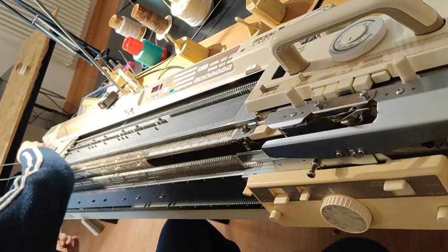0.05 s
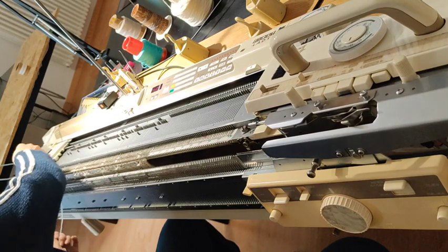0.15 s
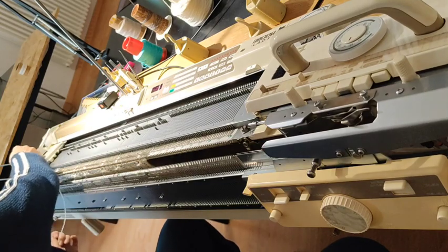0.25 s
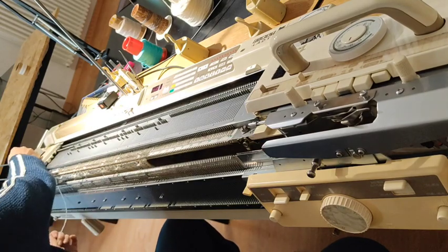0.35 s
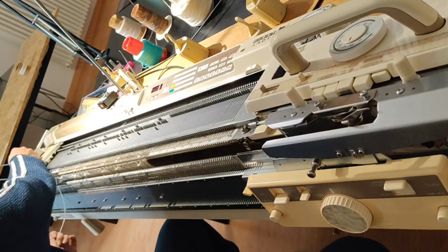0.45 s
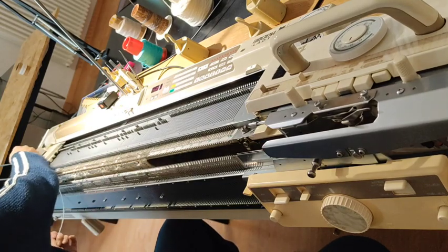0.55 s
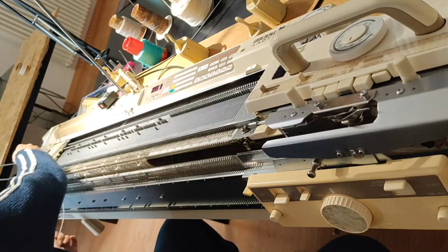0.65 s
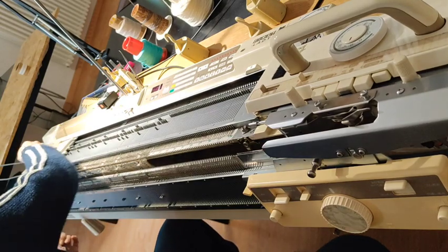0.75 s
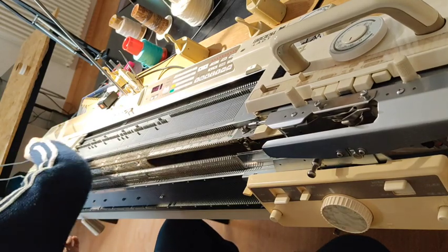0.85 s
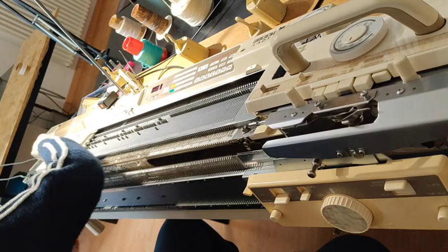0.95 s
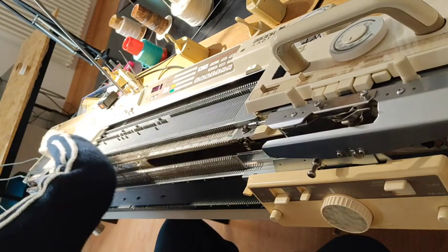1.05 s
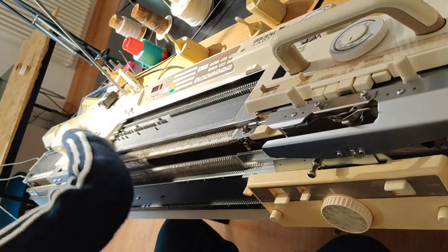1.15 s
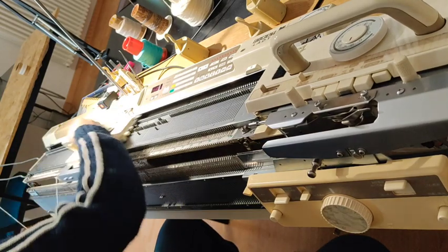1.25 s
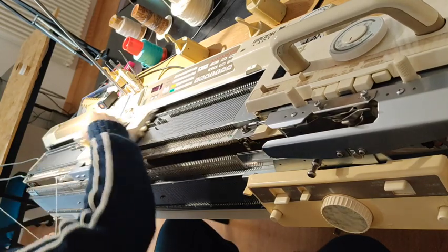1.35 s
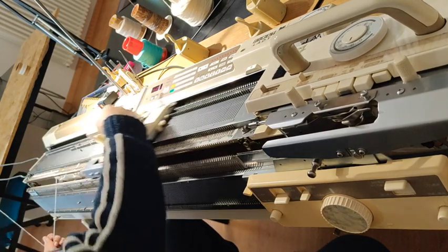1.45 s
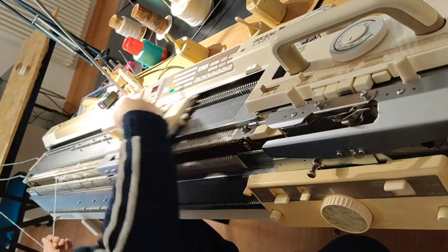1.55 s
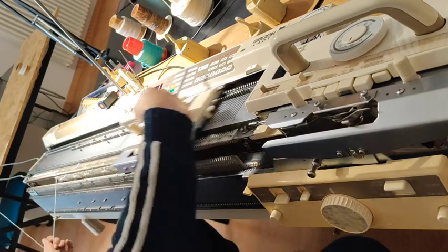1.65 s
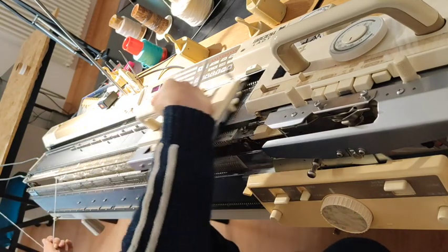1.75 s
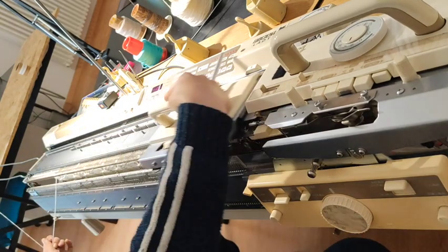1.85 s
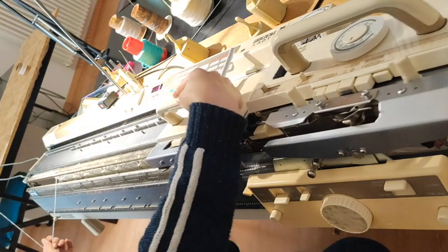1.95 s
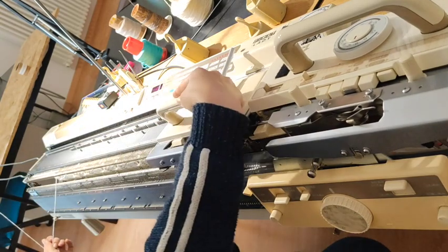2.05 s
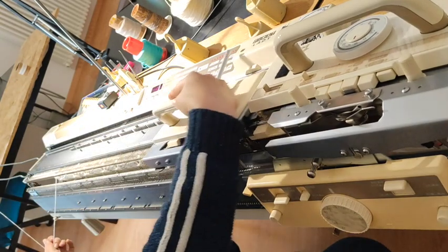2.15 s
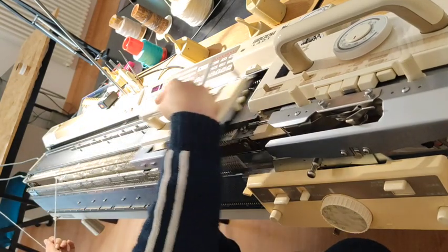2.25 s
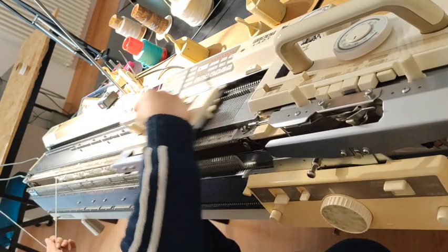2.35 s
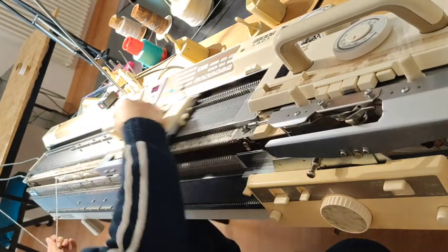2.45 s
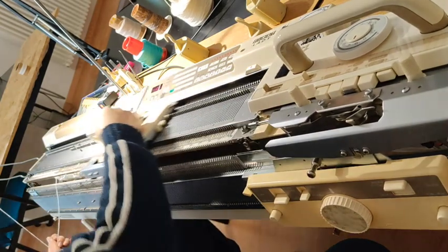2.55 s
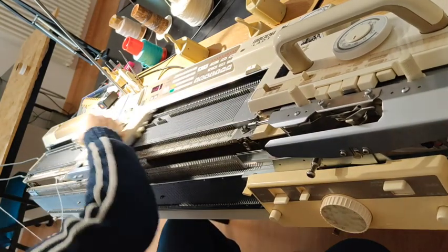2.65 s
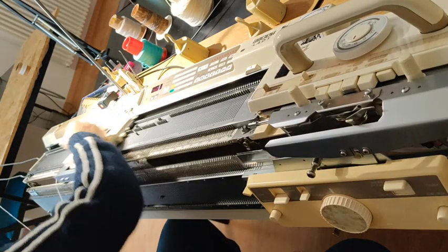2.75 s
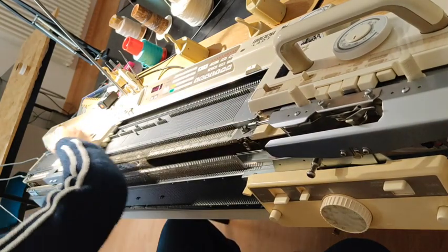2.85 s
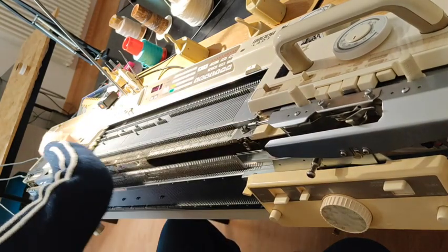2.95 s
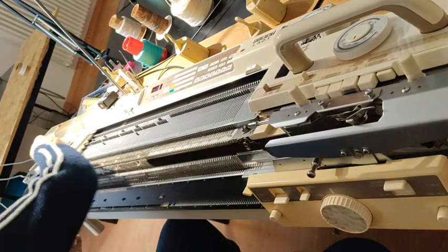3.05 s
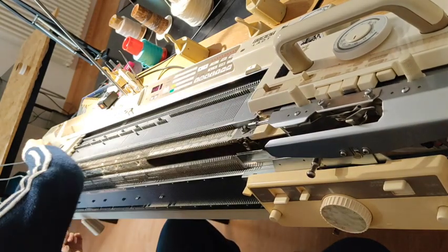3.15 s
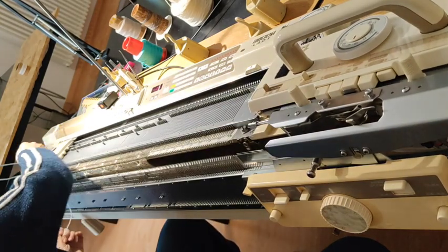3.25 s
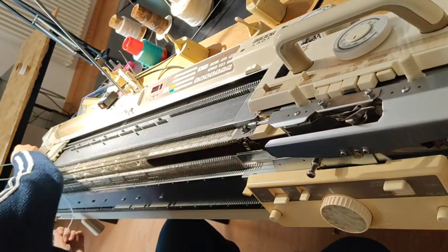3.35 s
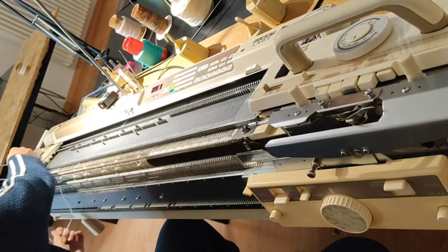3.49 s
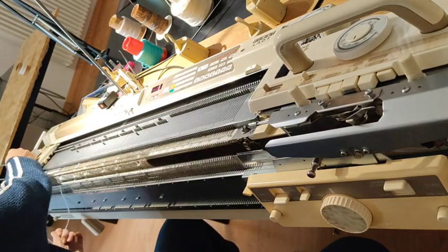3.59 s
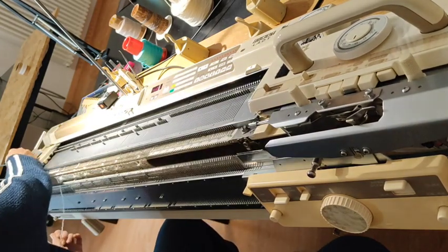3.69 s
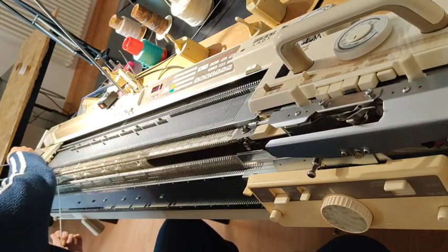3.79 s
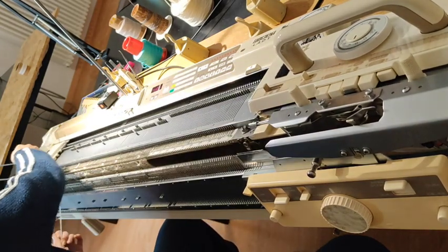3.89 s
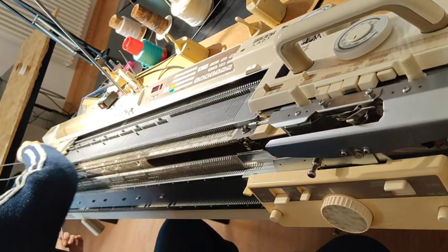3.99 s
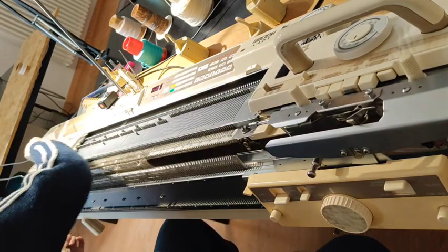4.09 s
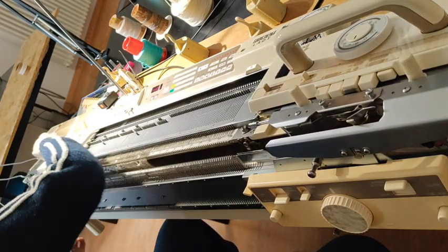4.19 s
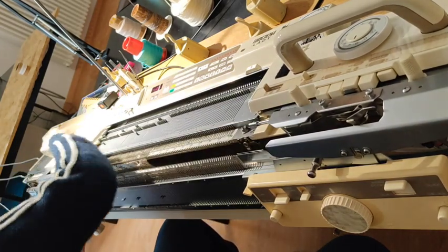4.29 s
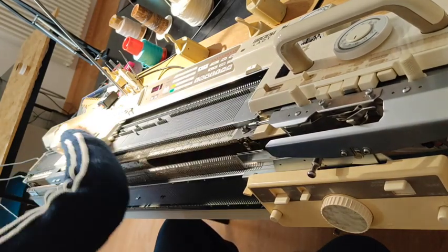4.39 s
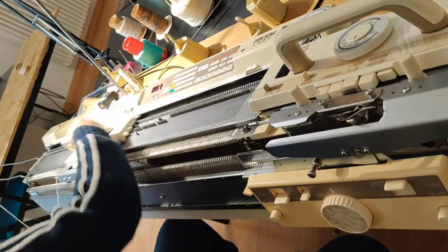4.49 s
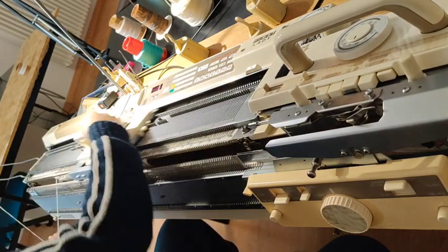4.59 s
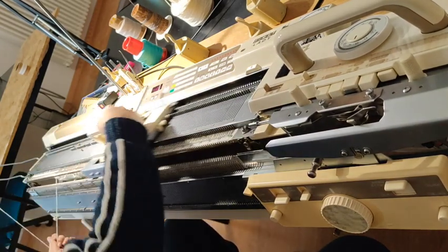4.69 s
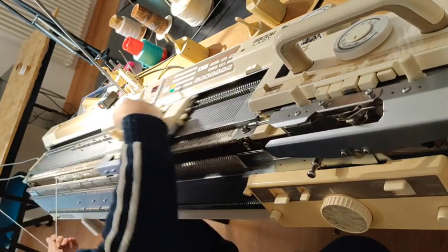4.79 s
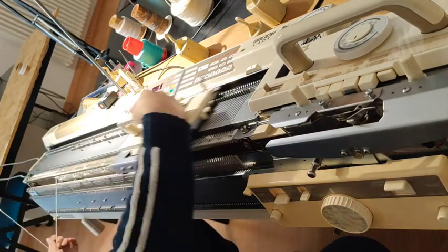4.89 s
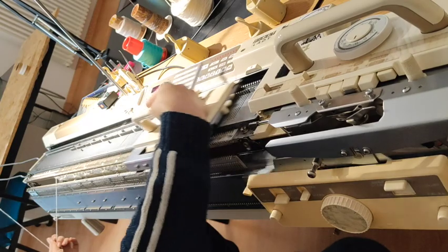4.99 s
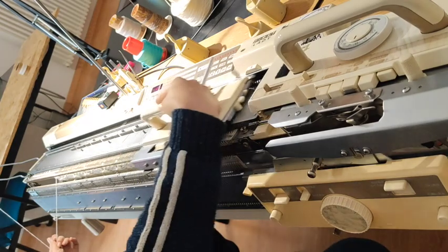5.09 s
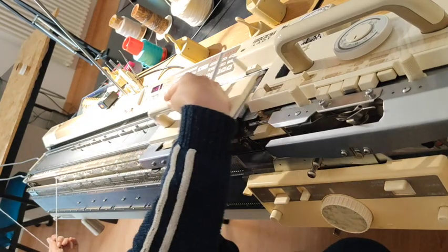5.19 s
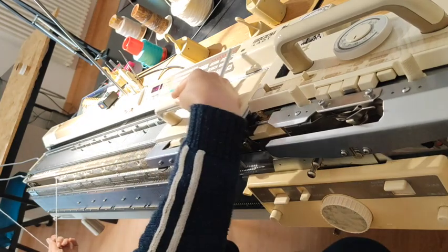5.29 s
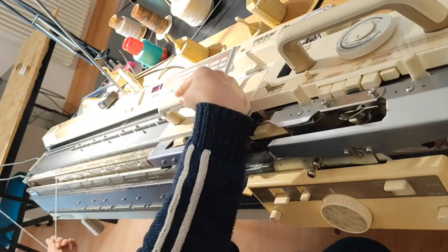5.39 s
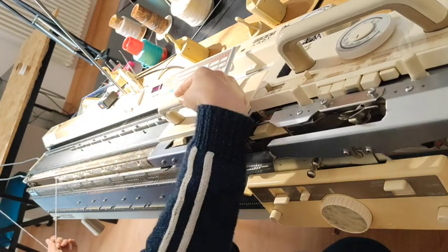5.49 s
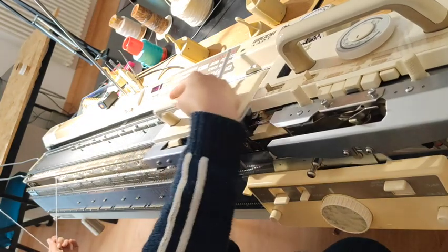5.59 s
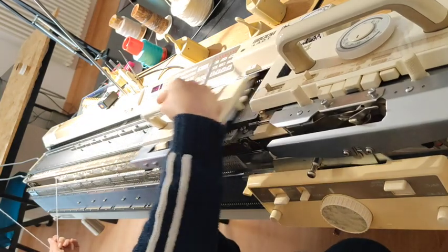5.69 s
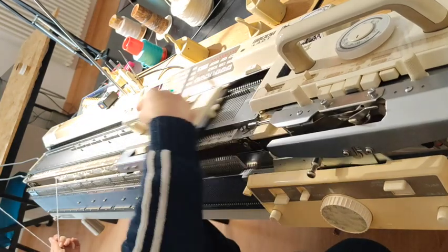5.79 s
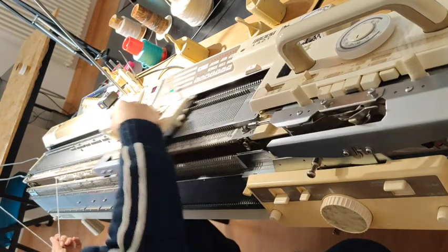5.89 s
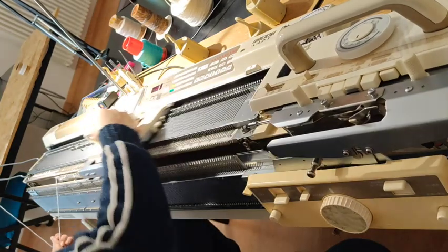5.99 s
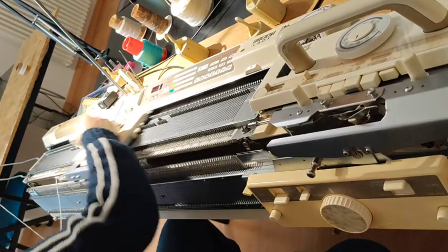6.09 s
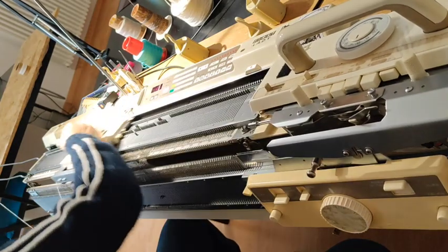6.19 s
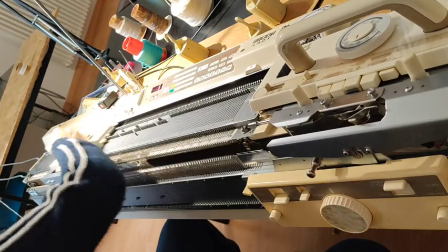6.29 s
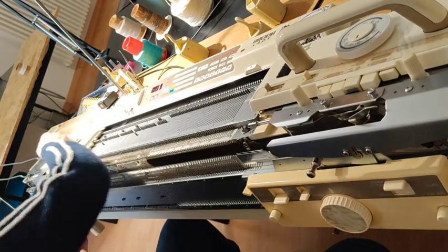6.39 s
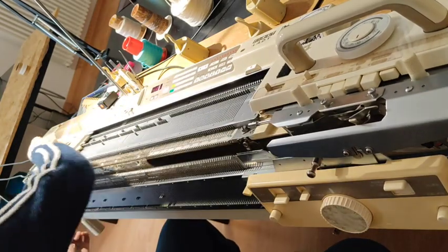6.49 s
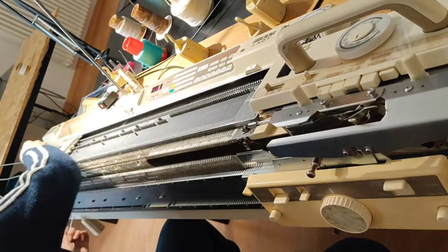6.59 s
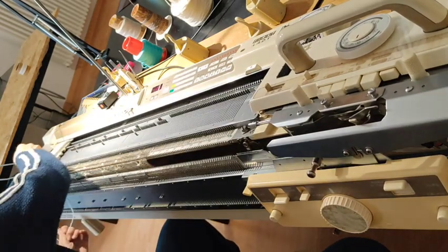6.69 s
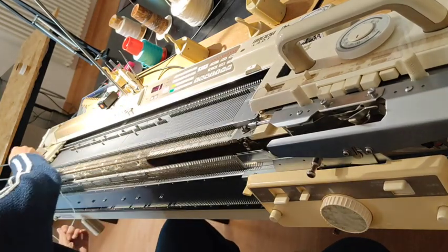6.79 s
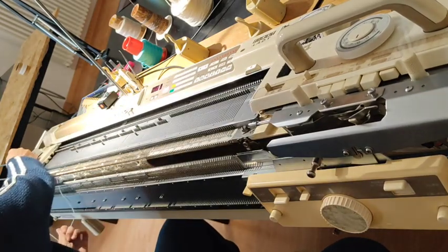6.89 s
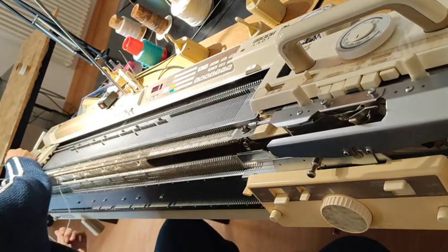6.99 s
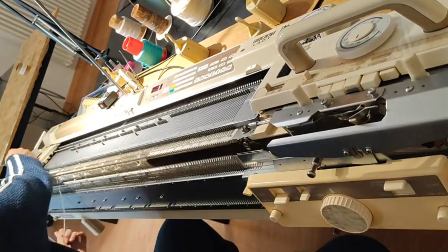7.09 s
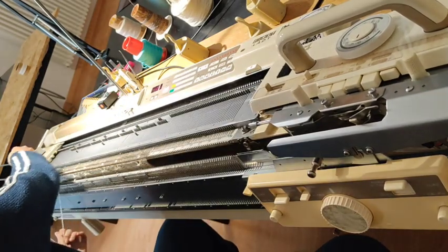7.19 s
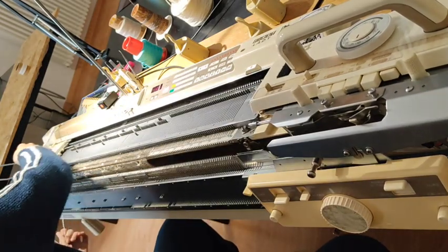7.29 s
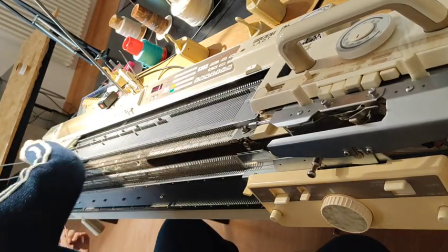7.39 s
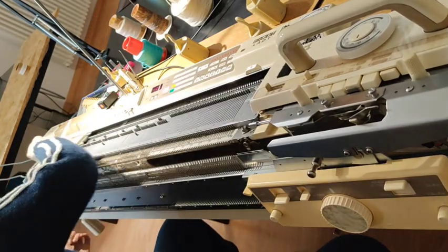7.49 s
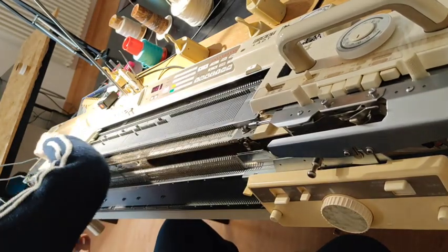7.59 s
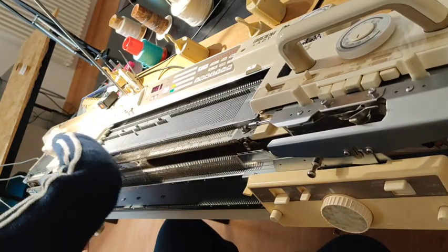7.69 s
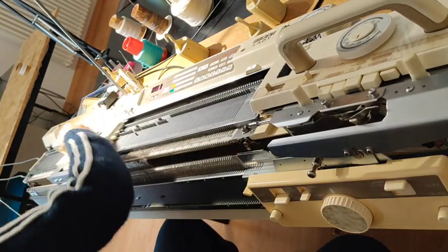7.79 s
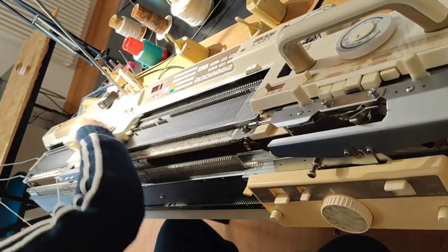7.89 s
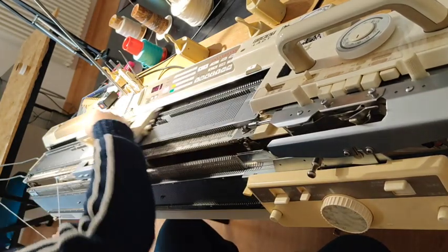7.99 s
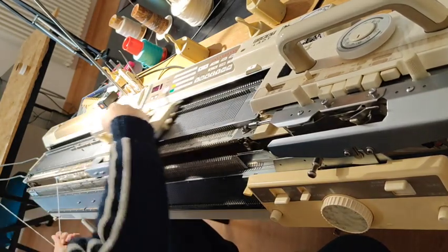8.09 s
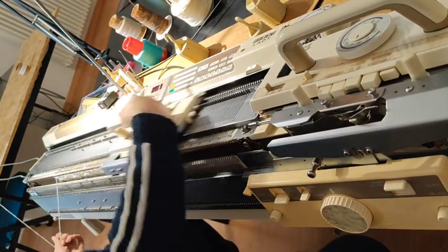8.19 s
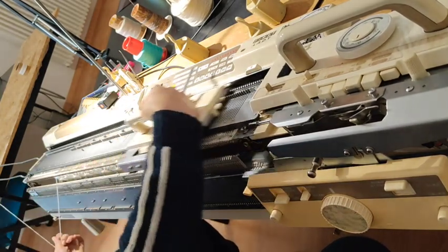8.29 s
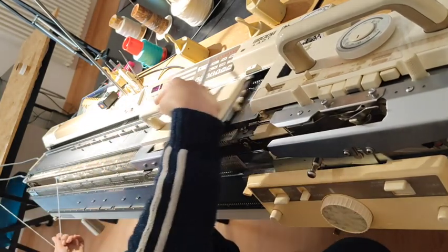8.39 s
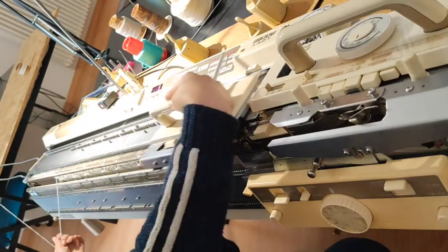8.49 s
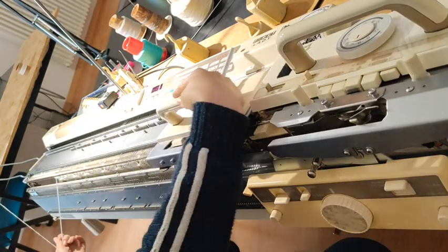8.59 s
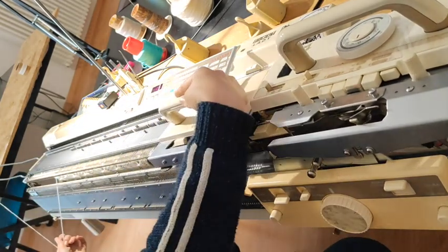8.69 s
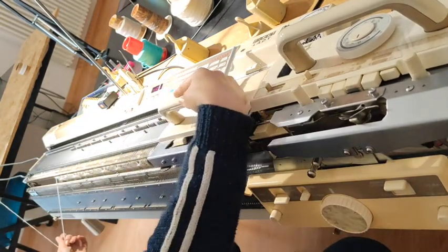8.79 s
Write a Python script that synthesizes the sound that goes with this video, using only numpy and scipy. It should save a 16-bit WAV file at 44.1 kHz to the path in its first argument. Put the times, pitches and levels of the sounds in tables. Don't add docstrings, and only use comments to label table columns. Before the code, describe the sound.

A hand-pushed knitting-machine carriage rattles back and forth over steel needles, bright dense clatter broken by ticks and short quiet pauses at each turn.

```python
import sys
import numpy as np
from scipy import signal
from scipy.fft import rfft, irfft, next_fast_len
from scipy.io import wavfile
from scipy.ndimage import uniform_filter1d

SR = 44100
rng = np.random.default_rng(int(sys.argv[2]) if len(sys.argv) > 2 else 0)


def amplitude_ratio(level_db):
    exponent = np.asarray(level_db, float) / 20
    return 10 ** exponent


def wrap_up_sound(samples):
    columns = np.atleast_2d(samples).T
    tamed = np.clip(columns, -1, 1)
    steps = np.round(tamed * 32767).astype(np.int16)
    wavfile.write(sys.argv[1], SR, steps)


N = 390285
SIZE = next_fast_len(N + SR // 4, True)
HZ = np.maximum(np.arange(SIZE // 2 + 1) * SR / SIZE, 1)
CONTROL_S = 0.001
LEFT_LAG_S = 0.00012
LAG = np.exp(-2j * np.pi * HZ * np.array([[LEFT_LAG_S], [0]]))

# (engage [s], leave [s], rattle [dB], release [dB/s])
KNITS = [
    (-0.1, 0.018, -14, 78),
    (0.871, 1.678, -14.5, 60),
    (2.358, 2.98, -14.5, 25),
    (3.097, 3.177, -16, 87),
    (3.312, 3.329, -18.5, 300),
    (4.107, 4.726, -14.5, 11),
    (4.87, 4.935, -15.5, 90),
    (5.781, 6.565, -14, 58),
    (6.712, 6.727, -16.5, 200),
    (7.497, 8.28, -14.5, 33),
]


def unit(x):
    return x / np.sqrt(np.mean(x ** 2))


def along(points):
    hz, value = np.transpose(points)
    return np.interp(np.log(HZ), np.log(hz), value)


def causal(db):
    cepstrum = irfft(np.log(amplitude_ratio(db)), SIZE)
    cepstrum[1:SIZE // 2] *= 2
    cepstrum[SIZE // 2 + 1:] = 0
    return np.exp(rfft(cepstrum))


def mode(hz, width):
    return 1 / (1 + 1j * (HZ ** 2 - hz ** 2) / (HZ * width))


def modes(rows):
    return sum((-1) ** k * amplitude_ratio(db) * mode(hz, width) for k, (hz, width, db) in enumerate(rows))


def dying(power, decay_s):
    pole = np.exp(-2 / (decay_s * SR))
    return signal.lfilter([1 - pole], [1, -pole], power)


def bursts(spikes, response, decay_s, rise_s=0.0002):
    # (frequency [Hz], share [0-1])
    likeness = [(60, 1), (290, 0.7), (640, 0.59), (1400, 0.05), (16000, 0.05)]
    room_t60_s, wet_db = 0.32, -0.5
    direct = dying(dying(spikes ** 2, rise_s), decay_s)
    tail = dying(direct, room_t60_s / np.log(1000))
    shape = np.sqrt(direct + amplitude_ratio(wet_db) ** 2 * tail)
    shared, *own = rfft(shape * rng.standard_normal((3, N)), SIZE)
    like = np.clip(along(likeness), 0, 1)
    mix = np.sqrt(like) * LAG * shared + np.sqrt(1 - like) * np.array(own)
    return irfft(response * mix, SIZE)[:, :N]


def contacts(per_s, spread_db, steady):
    chance, size = rng.random(N), rng.standard_normal(N)
    return unit((chance < per_s / SR) * amplitude_ratio(spread_db * size) + steady)


def walk(per_s):
    k = int(SR / per_s)
    return unit(uniform_filter1d(uniform_filter1d(rng.standard_normal(N), k), k))


def band_unit(response, lo_hz, hi_hz, ears):
    band = (HZ > lo_hz) * (HZ < hi_hz)
    return response / np.sqrt(np.mean(np.abs(response) ** 2 * ears * band))


def ports():
    # (frequency [Hz], width [Hz], gain [dB])
    port_peaks = [(8985, 940, 15.5), (7740, 774, 17.5)]
    # (frequency [Hz], difference [dB])
    bass_tilt = [(60, 7), (300, 3.5), (700, 5), (1500, 0), (3000, -0.3)]
    peak = np.array([1 + amplitude_ratio(db) * mode(hz, width) for hz, width, db in port_peaks])
    return peak * amplitude_ratio(along(bass_tilt) * np.array([[0.5], [-0.5]]))


def bodies():
    # (frequency [Hz], level [dB per Hz])
    needle_steel = [(3000, -33.5), (5000, -13.5), (6500, 0.5), (7300, 1), (8400, 2), (9400, 1), (10100, -9),
                    (11500, -6.5), (13000, -9), (16000, -17)]
    # (frequency [Hz], level [dB per Hz])
    cam_plate = [(300, -36), (900, -3), (1500, -9.5), (2100, 1.5), (2800, -1.5), (3700, -5), (5000, -2.5),
                 (6500, -8), (12000, -20.5)]
    # (frequency [Hz], level [dB per Hz])
    rail_rub = [(60, -31.5), (105, -9.5), (130, -20), (250, -11), (400, -13), (470, -2), (670, 0.5),
                (850, -1), (1200, -3.5), (1700, -8.5), (4000, -33.5)]
    # (frequency [Hz], width [Hz], level [dB])
    housing = [(450, 49, -7), (570, 11, -18), (652, 40, -4), (841, 17, -5)]
    ears = np.mean(np.abs(ports()) ** 2, axis=0)
    steel = band_unit(causal(along(needle_steel)), 5500, 11000, ears)
    plate = band_unit(causal(along(cam_plate)), 1800, 4870, ears)
    shell = band_unit(causal(along(rail_rub)) * (1 + modes(housing)), 400, 1210, ears)
    return steel, plate, shell, ears


def arches(time, rows, floor_db):
    s = np.arange(0, N / SR + CONTROL_S, CONTROL_S)
    arch_db = 13
    swells = [db - arch_db * ((2 * s - a - b) / (b - a)) ** 2 for a, b, db in rows]
    return np.interp(time, s, np.maximum(np.max(swells, axis=0), floor_db))


def background(time, ears):
    # (frequency [Hz], level [dB per Hz])
    room_tone = [(30, -4), (75, -8), (105, -3), (135, -16), (220, -4), (350, -10.5), (550, -8), (800, -14),
                 (1300, -17), (2200, -15.5), (5000, -21), (8000, -18), (10100, -42), (15000, -58)]
    # (from [s], to [s], low shake [dB])
    leans = [
        (-0.2, 0.6, -53),
        (1.5, 2.3, -57),
        (2.9, 3.8, -59),
        (3.7, 4.1, -55),
        (4.65, 5.35, -52),
        (5.9, 6.6, -55),
        (6.3, 7.2, -49),
        (7.2, 7.5, -48),
        (7.72, 8.2, -50),
        (8.0, 9.5, -49),
    ]
    room_db, stand_db = -50.5, -62
    air = unit(bursts(np.ones(N), amplitude_ratio(along(room_tone)) / np.sqrt(ears), 0.002))
    sway = mode(40.8, 4.4) ** 2 + amplitude_ratio(-10.5) * mode(61.3, 11) ** 2
    stand = band_unit(sway, 32, 48, ears)
    shake_db = arches(time, leans, stand_db) - 1.5
    return amplitude_ratio(room_db) * air + bursts(amplitude_ratio(shake_db), stand, 0.003)


def table(time, ears):
    # (frequency [Hz], width [Hz])
    table_modes = [(168, 25), (323, 21)]
    # (from [s], to [s], lower mode [dB], upper mode [dB])
    shakes = [(-0.3, 0.9, -47.5, -53.5), (0.85, 1.25, -42.5, -46), (1.15, 1.7, -46, -45),
              (1.6, 2.102, -48, -53), (2.33, 2.85, -46, -41.5), (2.55, 3.1, -40, -45),
              (3.298, 3.55, -46, -52), (4.2, 4.8, -45.5, -40), (5.748, 6.35, -45, -41.5),
              (5.9, 6.5, -41, -46), (7.645, 8.297, -46, -39.5), (7.9, 8.498, -45.5, -51)]
    idle_hum_db, wander_db = (-61, -62), 1.5
    a, b, *tops = np.transpose(shakes)
    hum = np.zeros((2, N))
    for top_db, idle_db, (hz, width) in zip(tops, idle_hum_db, table_modes):
        level_db = arches(time, zip(a, b, top_db), idle_db) - 4.0 + wander_db * walk(9.9)
        wood = band_unit(mode(hz, width) ** 2, hz / 2, hz * 2, ears)
        hum += bursts(amplitude_ratio(level_db), wood, 0.002)
    return hum


def ticks(steel, plate, shell, ears):
    # (time [s], peak [dB], dull part re peak [dB], ring re peak [dB])
    latches = [(0.4878, -28, -15, -19), (0.5272, -25, -17, -20), (0.5387, -24, -15, -21),
               (0.5741, -29, -9, -13), (0.6105, -19, -18, -15), (0.6644, -18.5, -12, -9),
               (0.6903, -14, -18, -19), (0.8091, -18, -14, -23), (1.9665, -11.5, -19, -11),
               (1.9967, -8, -12.5, -13.5), (2.164, -21.5, -12, -17), (2.2189, -25, -21, -9),
               (2.2303, -18, -14, -15), (2.2862, -16, -18, -14), (2.2952, -13, -17, -22),
               (3.7354, -22.5, -6, -13), (3.925, -23, -20, -17), (3.9774, -5.5, -16.5, -17),
               (5.2295, -22.5, -18.5, -17), (5.288, -21, -20, -18), (5.2958, -10.5, -18, -14),
               (5.3675, -13.5, -8, -17), (5.5692, -25, -11, -18), (5.6236, -24, -13, -11),
               (5.6406, -20, -21, -18), (5.698, -10, -20, -19), (7.1258, -24, -5.5, -15),
               (7.3088, -23, -19, -18), (8.5872, -10.5, -21, -14), (8.6652, -19, -19, -16)]
    # (time [s], peak [dB])
    throws = [(0.853, -11), (0.8628, -7), (1.1832, 1.5), (1.6596, -3), (2.3476, -12), (2.362, -4),
              (2.5541, -2), (2.7593, -4.5), (3.1078, -4), (3.304, -9), (3.3129, -10), (4.1071, -9),
              (4.119, 0), (4.1969, 0), (4.8803, -3), (5.0574, -9), (5.7857, -6), (6.188, -8), (6.3485, -6),
              (6.5217, -6), (6.5794, -2), (6.71, -4), (7.4874, -13), (8.258, -10), (8.846, -21.5)]
    # (frequency [Hz], width [Hz], level [dB])
    tick_ring = [(2130, 480, 4), (2710, 200, 21), (4400, 1200, 1.5), (1300, 600, -12)]
    throw_dull_db, throw_ring_db, pan_db = -24, -20, -3
    hits = latches + [(s, db, throw_dull_db, throw_ring_db) for s, db in throws]
    s, peak_db, dull_db, ring_db = np.transpose(hits)
    at = np.minimum((s * SR).astype(int), N - 1)
    bright, ringing, dull = np.zeros((3, N))
    bright[at] = amplitude_ratio(peak_db)
    ringing[at] = amplitude_ratio(peak_db + ring_db)
    dull[at] = amplitude_ratio(peak_db + dull_db)
    ringing_plate = plate + amplitude_ratio(2.0) * band_unit(modes(tick_ring), 1500, 5000, ears)
    crack = amplitude_ratio(11.5) * bursts(bright, steel, 0.0054, 0.0005)
    ring = amplitude_ratio(15) * bursts(ringing, ringing_plate, 0.0061, 0.0005)
    knock = amplitude_ratio(16) * bursts(dull, shell, 0.011, 0.00087)
    return (crack + ring + knock) * amplitude_ratio(np.array([[pan_db], [-pan_db]]) / 2)


def held_back(time):
    build_db, build_s = 5, 0.11
    since = np.array([time - a for a, b, *_ in KNITS if b - a > build_s])
    return build_db * np.max((since > 0) * np.exp(-np.abs(since) / build_s), axis=0)


def rail(rub_db, shell):
    judder = contacts(400, 1.9, 0.066) * amplitude_ratio(rub_db + 1.12 * walk(12.6))
    return bursts(judder, shell, 0.0033, 0.00082)


def rattle(time):
    # (starts [s], at speed [s], slows [s], stops [s], level [dB])
    glides = [(-1.0, -0.8, 0.3, 0.52, -29), (0.46, 0.7, 1.866, 2.2, -30), (2, 2.31, 3.37, 3.75, -26.5),
              (3.72, 3.75, 3.8, 3.92, -45), (3.5, 4, 3.97, 4.0, -38), (4, 3.985, 5.03, 5.21, -24.5),
              (5, 5, 5.26, 5.3, -45), (5.27, 5.5, 5.38, 5.5, -38.5), (5.52, 5.5, 5.69, 5.72, -37),
              (5.67, 5.5, 6.806, 7.1, -25.5), (7, 7.13, 7.18, 7.3, -42), (7, 7.5, 8.42, 8.62, -25),
              (8.44, 8.52, 8.6, 8.77, -36)]
    rest_db = -56
    engage_db_per_s, sag_db_per_s, let_go_db_per_s2 = 600, 2.05, 250
    s = np.arange(0, N / SR + CONTROL_S, CONTROL_S)
    levels = [np.interp(s, row[:-1], [rest_db, row[-1], row[-1], rest_db]) for row in glides]
    for a, b, db, fall in KNITS:
        engage = engage_db_per_s * np.maximum(a - s, 0)
        sag = sag_db_per_s * (s - a)
        let_go = np.maximum(s - b, 0) * (fall + let_go_db_per_s2 * (s - b))
        levels.append(db - engage - sag - let_go)
    return np.interp(time, s, np.max(levels, axis=0))


def needles(rattle_db, cam_db, steel, plate):
    clusters_db = 0.6 * walk(30)
    strikes = contacts(850, 4.2, 0.08) * amplitude_ratio(rattle_db + clusters_db)
    thin = amplitude_ratio(-1.5) * bursts(strikes, steel, 0.0016)
    below = amplitude_ratio(-2.0) * bursts(strikes * amplitude_ratio(cam_db), plate, 0.0039, 0.0006)
    return thin + below


def scene():
    time = np.arange(N) / SR
    steel, plate, shell, ears = bodies()
    rattle_db = rattle(time)
    below_db = -15 - rattle_db
    rub_db = np.minimum(-17.5 + 0.54 * below_db, -2.5)
    cam_db = -11.5 + 0.17 * below_db
    pan_db = np.maximum(2.4 - 0.32 * below_db, -3)
    bed = needles(rattle_db, cam_db, steel, plate) * amplitude_ratio(np.array([pan_db, -pan_db]) / 2)
    rub = rail(rattle_db + rub_db - held_back(time) - 1.88, shell)
    carriage = bed + rub + ticks(steel, plate, shell, ears)
    return carriage + table(time, ears) + background(time, ears)


def band_limit(x):
    return signal.sosfilt(signal.butter(12, 16010, fs=SR, output="sos"), x)


def record(dry):
    ceiling = 0.74
    coloured = irfft(rfft(dry, SIZE) * ports(), SIZE)[:, :N]
    rounded = ceiling * np.tanh(coloured / ceiling)
    top_cut = signal.ellip(10, 0.2, 70, 16000, fs=SR, output="sos")
    return band_limit(signal.sosfilt(top_cut, rounded))


dry = scene()
out = record(dry)
wrap_up_sound(out)
```